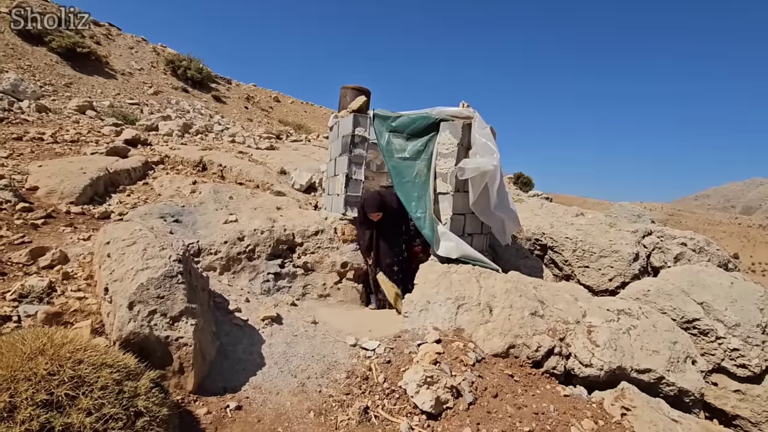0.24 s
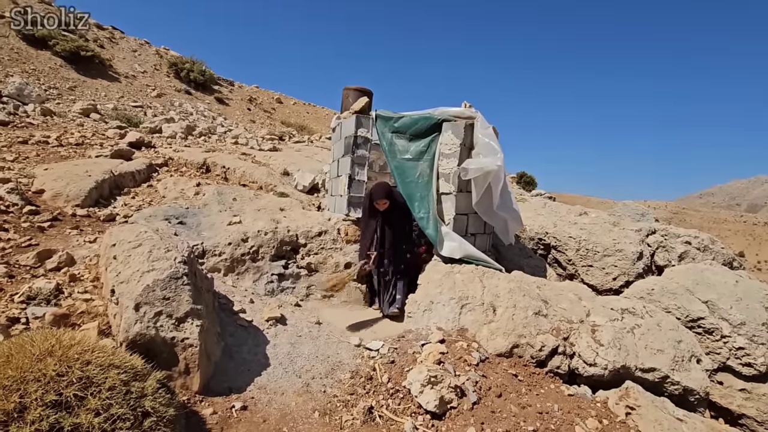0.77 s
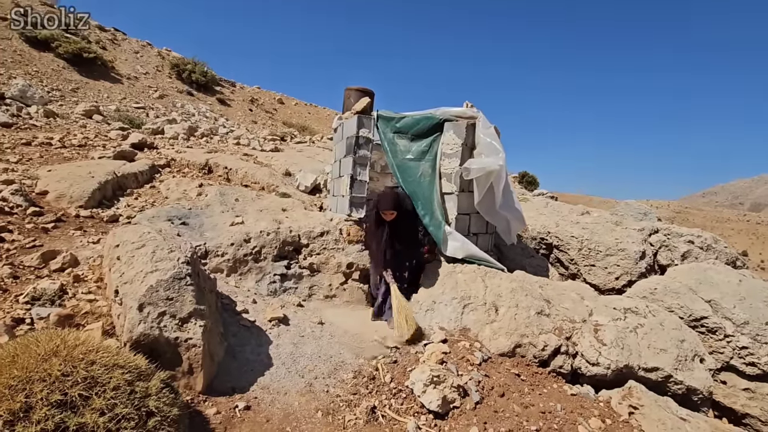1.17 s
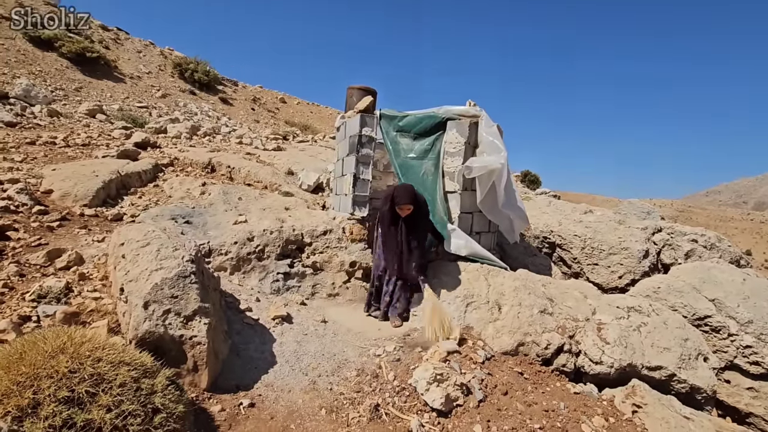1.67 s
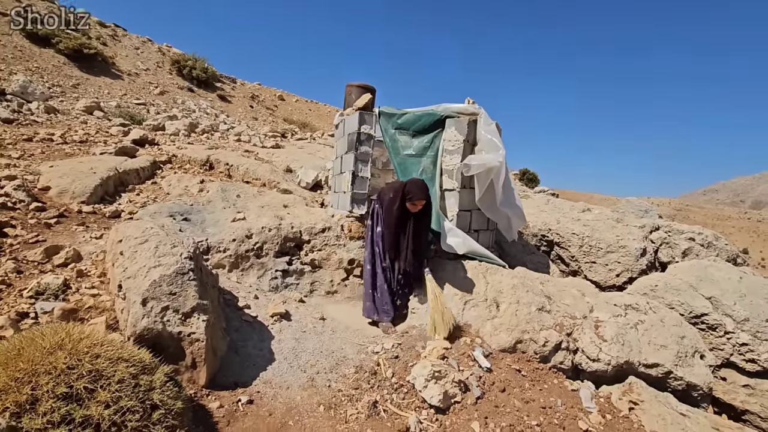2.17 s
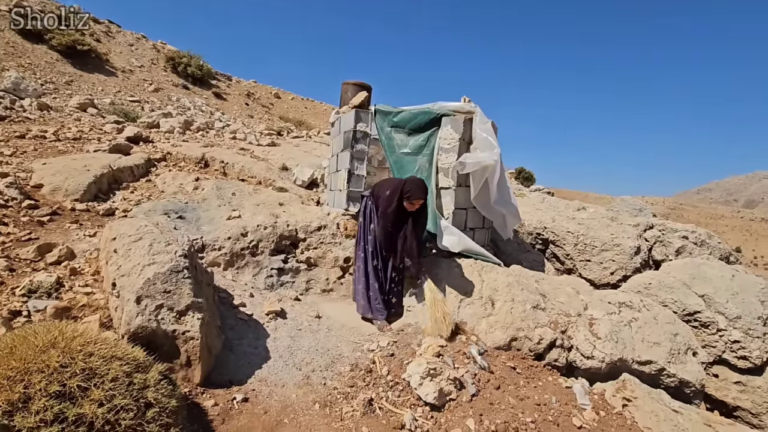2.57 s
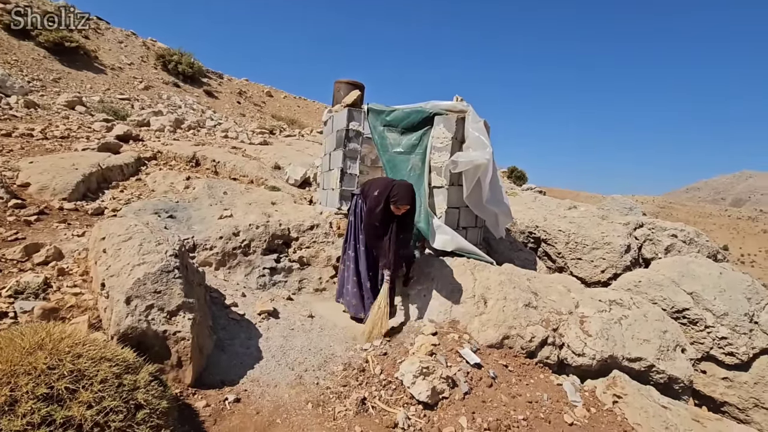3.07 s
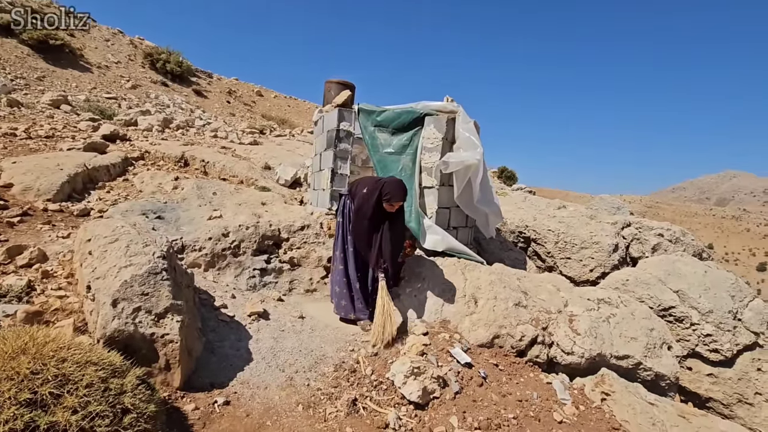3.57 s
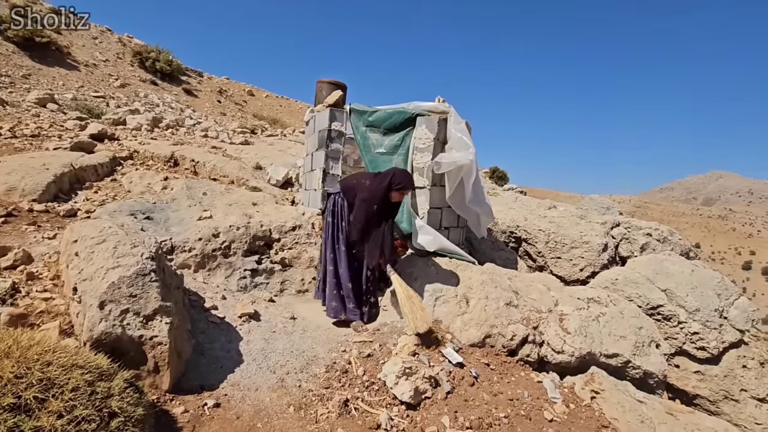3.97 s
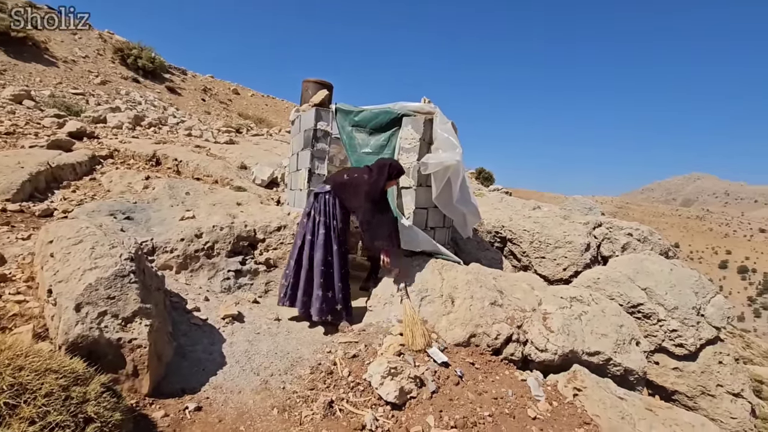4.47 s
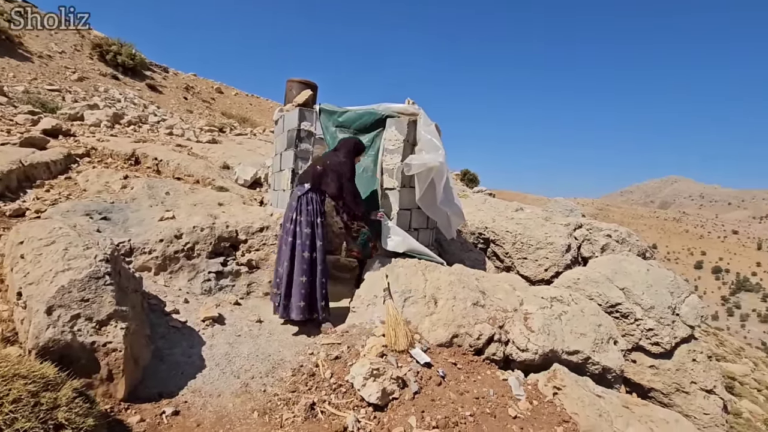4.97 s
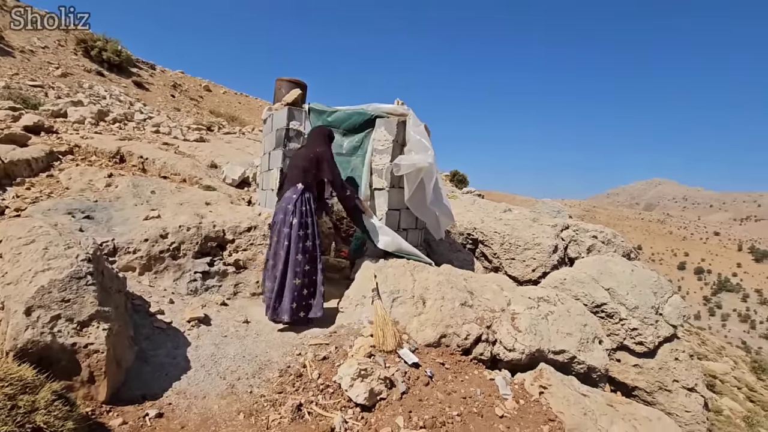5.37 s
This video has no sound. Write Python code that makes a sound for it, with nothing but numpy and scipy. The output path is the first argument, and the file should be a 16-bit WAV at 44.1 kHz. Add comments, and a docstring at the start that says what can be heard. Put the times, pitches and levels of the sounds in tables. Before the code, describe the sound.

Dry straw hisses over dirt in short swipes of uneven strength, the fifth strongest, each followed by a fine sprinkle of dust. Gravelly footfalls and bright straw ticks fill the gaps. After the last swipe come a tiny stone ring, a crisp broom drop, soft clothing rustle and dull hollow knocks. Faint high chick peeps and low wind bumps sit behind, in open air with only a thin echo from rocks, heard by a stereo microphone.

```python
"""Short straw broom on dry dirt and rock

Outdoors, straw tips hiss and grit rattles in dense random grains that follow the pressure of each stroke.
Thrown dust trickles after it, feet crunch, clothes rustle, and straws and stones click as filtered bursts.
The broom is dropped; a stone flake rings and something hollow thumps, both as sums of dying modes.
A chick peeps faintly in gliding tones all along, and filtered noise makes wind rumble on the microphone."""
import sys
import numpy as np
from scipy import signal
from scipy.fft import rfft, irfft, next_fast_len
from scipy.io import wavfile
from scipy.ndimage import uniform_filter1d

SR = 44100
rng = np.random.default_rng(int(sys.argv[2]) if len(sys.argv) > 2 else 0)


def bounce(signal):
    """Save signal as a 16-bit WAV file at the path given by the first command-line argument."""
    frames = np.transpose(np.atleast_2d(signal))
    limited = np.clip(frames, -1, 1)
    pcm = np.round(limited * 32767).astype(np.int16)
    wavfile.write(sys.argv[1], SR, pcm)


N = 247577
TIME = np.arange(N) / SR
PADDED = next_fast_len(N)
HZ = np.fft.rfftfreq(PADDED, 1 / SR)

# Broom strokes. Each row: start in seconds, length in seconds, relative hiss level at mid-stroke in dB,
# leaning in dB/s, attack in seconds, lifting off in dB/s, grit against the hiss in dB,
# thrown dust against the hiss in dB.
STROKES = [(0.27, .14, -36.8, 37, .021, 495, -17, -32), (0.936, .209, -49.5, 120, .006, 230, -12, -10.5),
           (1.524, .273, -34.3, -61, .038, 400, -24, -13.5), (2.02, .238, -42.5, 44, .027, 300, -15, -24),
           (2.478, .161, -30.8, -36, .073, 290, -12.5, -24.5),
           (3.012, .2, -37.9, -14, .023, 295, -14, -17.5), (3.5, .123, -45.4, -95, .013, 375, -11, -17)]
# Colour of straw and dust. Each row: frequency in Hz, relative density in dB per Hz.
STRAW_COLOUR = [(300, -32), (900, -30.5), (2000, -12), (3900, -10), (5400, -1), (7000, -2), (8300, -5.5),
                (9800, -7), (11300, 1), (13300, -2), (14500, 1.5), (16000, -3)]


def gain_of(db):
    """Turns decibels into an amplitude factor."""
    return 10 ** (np.asarray(db) / 20)


def evened(x):
    """Scales to rms 1."""
    return x / np.sqrt(np.mean(x ** 2) + 1e-20)


def read(points, hz):
    """Reads a table on a log-frequency axis."""
    f, value = np.transpose(points)
    return np.interp(np.log(hz + 1), np.log(f + 1), value)


def add(mix, s, sound):
    """Lays a sound into the mix from a given second, cut at the end."""
    part = mix[..., max(round(s * SR), 0):][..., :sound.shape[-1]]
    part += sound[..., :part.shape[-1]]


def hump(s, width_s):
    """A bell-shaped swell of height 1 around a moment; the width is its standard deviation."""
    return np.exp(-.5 * ((TIME - s) / width_s) ** 2)


def dying(s, db_per_s):
    """Starts at full strength and fades evenly in dB."""
    return (TIME >= s) * gain_of(-db_per_s * np.maximum(TIME - s, 0))


def wander(rate_hz):
    """Slow random drift of rms 1: noise without its content above the rate."""
    lowpass = 1 / (1 + (HZ / rate_hz) ** 4)
    return evened(irfft(rfft(rng.standard_normal(PADDED)) * lowpass, PADDED)[:N])


def coloured(x, spectrum):
    """Causal minimum-phase filter with the given spectrum, so clicks keep their sharp front; rms 1."""
    log_gain = np.log(gain_of(read(spectrum, abs(np.fft.fftfreq(8192, 1 / SR)))))
    response = np.exp(signal.hilbert(log_gain).conj())
    taps = np.fft.ifft(response).real[:4096]
    return evened(signal.oaconvolve(x, taps[None], axes=1)[:, :N])


def band(x, hz, octaves):
    """One broad resonance."""
    half = 2 ** (octaves / 2)
    edges = np.clip([hz / half, hz * half], 20, SR / 2 - 500)
    return signal.sosfilt(signal.butter(2, edges, "band", fs=SR, output="sos"), x)


def grains(per_s, spread_db, ring_s, top_hz, size):
    """Many small contacts of uneven strength, each ringing briefly at its own pitch; rms 1."""
    chance, strength, pitch, damping, phase = rng.random((5, N))
    at = np.flatnonzero(chance < per_s / SR)
    life = ring_s * (.15 + damping[at])
    loudness = gain_of(-spread_db * np.log(strength[at] + .015)) / np.sqrt(life)
    swing = loudness * np.exp(2j * np.pi * phase[at])
    # one sample's turn and decay of each contact
    step = np.exp((2j * np.pi * top_hz * pitch[at] - 1 / life) / SR)
    side = rng.choice([-1, 1], N)[at]
    out = np.zeros((2, N + size))
    for age in range(size):
        out[0][at + age] += swing.real
        out[1][at + age] += swing.imag * side
        swing = swing * step
    return evened(out[:, :N])


def clicks(rows, octaves, scatter):
    """A sharp crack and a brief noisy scatter after it, in one broad resonance."""
    out, t = np.zeros((2, N)), TIME[:4096]
    for s, db, hz, t60 in rows:
        burst = scatter * rng.standard_normal((2, len(t))) * gain_of(-60 * t / t60)
        burst[0, 0] += 1
        click = band(burst, hz, octaves)
        # every click gets the energy of 1.8 ms at full level
        even = np.sqrt(SR * 0.0018 / np.sum(click ** 2))
        add(out, s, gain_of(db) * click * even)
    return out


def ring(modes):
    """Dying modes of a struck thing, as a sum of fading cosines."""
    t = TIME[:SR]
    return sum(gain_of(db - 60 * t / t60) * np.cos(2 * np.pi * hz * t) for hz, db, t60 in modes)


def rocks(x, t60):
    """The rocks nearby scatter a short, thin echo through sparse random taps."""
    t = TIME[:SR // 3]
    sparse = (rng.random((2, len(t))) < 2000 / SR) * (t > .004)
    taps = rng.standard_normal((2, len(t))) * sparse * gain_of(-60 * t / t60)
    return signal.oaconvolve(x, taps / np.linalg.norm(taps[0]), axes=1)[:, :N]


def outdoors():
    """Lumpy low noise of wind on the microphone over the quiet outdoor air."""
    # Puffs of wind. Each row: centre in seconds, relative level in dB, spread in seconds.
    puffs = [(.11, -60, .025), (.72, -63, .12), (1.27, -53, 0.062), (1.49, -57.5, 0.063), (2.09, -59, .03),
             (2.39, -54.5, .04), (2.62, -62, .08), (2.855, -50, .025), (2.97, -52, .07), (4.65, -54, 0.052),
             (4.91, -51, .04), (5.28, -49.5, 0.051), (5.53, -56.5, .04)]
    # Colours of wind and air. Each row: frequency in Hz, relative density in dB per Hz.
    wind_colour = [(10, -5.5), (35, 0.5), (60, -0.5), (110, -13.5), (200, -20), (400, -42.5), (1500, -83.5)]
    air_colour = [(20, 2), (120, -6), (210, 1.5), (330, -15.5), (550, -9.5), (850, -18.5), (1400, -17),
                  (2300, -14.5), (4000, -21), (6500, -24.5), (9500, -43), (12000, -26), (16000, -27.5)]
    breeze_db = -66.5  # the steady part under the puffs
    power = gain_of(breeze_db) ** 2 + sum((gain_of(db) * hump(s, width)) ** 2 for s, db, width in puffs)
    gusts = coloured(rng.standard_normal((2, N)), wind_colour) * gain_of(2.57 * wander(12.6))
    air = coloured(rng.standard_normal((2, N)), air_colour) * gain_of(1.5 * wander(5.9))
    return np.sqrt(power) * gusts + gain_of(-70.5) * air


def chick():
    """Each peep is two brief upward flicks and a longer slur that hooks over at the top, slightly rough."""
    # Peeps. Each row: time in seconds, relative level in dB.
    peeps = [(0.093, -60), (0.205, -61), (0.433, -64), (0.561, -67), (0.737, -69), (1.943, -59),
             (2.308, -57), (2.438, -57), (2.695, -61), (2.818, -64), (2.955, -63), (3.751, -67),
             (3.988, -70), (4.253, -66), (4.681, -66), (4.885, -65), (5.008, -62), (5.133, -62),
             (5.302, -64), (5.457, -65), (5.59, -64)]
    # Slurs of one peep. Each row: offset in seconds, length in seconds, starting pitch and
    # pitch aimed at as shares of the reference pitch, level in dB.
    slurs = [(-.012, 0.013, 0.6, 1.1, -6), (-.006, 0.011, 0.56, 1.12, -5), (0, .033, .58, 1., -0.5)]
    # Drift of the reference pitch. Each row: time in seconds, pitch in Hz.
    pitch_drift = [(0, 3114), (3, 3025), (4.7, 2680), (5.1, 2950)]
    out = np.zeros((2, N))
    for s, db in peeps:
        reference_hz = np.interp(s, *np.transpose(pitch_drift))
        for offset, length, first, aim, slur_db in slurs:
            u = np.linspace(0, 1, int(length * SR))
            hook = np.interp(u, [0, .72, 1], [0, 1.05, .75])
            rough = 1 + .17 * uniform_filter1d(rng.standard_normal(len(u)), size=30)
            hz = reference_hz * (first + (aim - first) * hook) * rough
            swell = np.sin(np.pi * u ** 1.1).clip(0) ** 0.71
            tone = np.sin(2 * np.pi * np.cumsum(hz) / SR)
            add(out[0], s + offset, gain_of(db + slur_db) * swell * tone)
    return gain_of(4.) * out + gain_of(-9) * rocks(out[[0, 0]], t60=0.12)


def rustles():
    """Soles sliding and the skirt rustling: soft swells of fine rubbing grains."""
    # Rustles. Each row: start in seconds, relative level in dB, length in seconds, centre in Hz,
    # width in octaves.
    rubs = [(0.75, -64, .19, 2200, .6), (0.76, -73, .18, 6000, 1.3), (2.464, -60, 0.073, 1520, 1.3),
            (2.56, -60.5, 0.058, 510, .8), (2.78, -57, .025, 2200, .7), (3.466, -52, .025, 1600, .9),
            (3.87, -71, .22, 1520, 1.3), (4.19, -62, .17, 9500, 1.5), (4.225, -63.5, .06, 2270, 1.3),
            (4.379, -52, .05, 2600, 1.3), (4.378, -54, 0.057, 11000, 1.3), (4.55, -64.5, .06, 7500, 1.3),
            (4.965, -72, .04, 1200, .5), (5.183, -60, .07, 5050, 1.3), (5.18, -62, .1, 700, 1.3),
            (5.352, -69, 0.12, 5000, 1.3), (5.3, -75, 0.19, 1130, .9)]
    fine = grains(per_s=4000, spread_db=2.5, ring_s=0.00072, top_hz=16970, size=100)
    out = np.zeros((2, N))
    for s, db, length, hz, octaves in rubs:
        swell = signal.windows.tukey(int(length * SR), .7)
        piece = fine[:, int(s * SR):][:, :len(swell)]
        add(out, s, gain_of(db) * swell * evened(band(piece, hz, octaves)))
    return out


def steps():
    """Soles crunch and scuff: each footfall crushes a short burst of gravel grains."""
    # Footfalls. Each row: start in seconds, relative level in dB.
    footfalls = [(1.219, -45), (1.297, -47), (1.362, -34), (1.382, -48), (1.434, -40), (1.932, -41),
                 (1.997, -38), (2.781, -51), (3.359, -50), (3.465, -43), (5.177, -44.5), (5.189, -45)]
    # Colour of grit. Each row: frequency in Hz, relative density in dB per Hz.
    gravel_colour = [(100, -23.5), (280, -13.5), (400, -20), (520, -4.5), (660, -3.5), (830, -13.5),
                     (1100, -4.5), (1500, -1.5), (2300, 0), (3000, -3.5), (4000, -9.5), (6000, -8),
                     (9000, -20.5), (16000, -27.5)]
    attack_s, t60_s = .004, .14
    press = np.zeros(N)
    for s, db in footfalls:
        rise = np.clip((TIME - s) / attack_s, 0, 1)
        press += gain_of(db) * dying(s, 60 / t60_s) * rise
    gravel = grains(per_s=3000, spread_db=2.5, ring_s=0.0014, top_hz=10040, size=240)
    return gain_of(-4.5) * press * coloured(gravel, gravel_colour)


def thumps():
    """Something hollow booms in its modes, duller the longer the push."""
    # Pushes. Each row: start in seconds, relative level in dB, length in seconds.
    bumps = [(3.005, -56, .004), (4.348, -42, .008), (4.424, -50, 0.0031), (5.005, -55, 0.0037),
             (5.179, -39.5, .004), (5.19, -38.5, .002), (5.2, -31.5, 0.0039), (5.305, -37, .0028)]
    # Modes of the hollow thing. Each row: frequency in Hz, level in dB, t60 in seconds.
    hollow_modes = [(110, -8, .08), (160.2, 0, .1), (197.6, 0, 0.1), (183.6, -15, 0.55), (292, -16, 0.027),
                    (510, -9.5, 0.078), (1020, -7.5, 0.062)]
    out = np.zeros((2, N))
    boom = ring(hollow_modes)
    for s, db, push_s in bumps:
        push = np.hanning(max(int(push_s * SR), 3))
        add(out[0], s, gain_of(db) * signal.fftconvolve(boom, push / push.sum()))
    return out


def flake():
    """A flake of stone chinks off to the right, ringing in its modes."""
    # Modes of the flake. Each row: frequency in Hz, level in dB, t60 in seconds.
    flake_modes = [(4960, -10, .03), (5380, -12, 0.033), (7320, 4.5, .04), (7520, -12.5, .025),
                   (10300, -3.5, 0.036), (11050, -18.5, 0.017), (11470, 7.5, 0.021), (15200, -25.5, .02)]
    out = np.zeros((2, N))
    rise = np.minimum(TIME[:SR] / 0.00065, 1)
    lean = np.array([[1], [-.25]])  # a negative unshared part leans right
    add(out, 3.629, gain_of(-26.5) * ring(flake_modes) * rise * lean)
    return out


def pebbles():
    """Pebbles knock on rock: low, broad clicks."""
    # Knocks. Each row: start in seconds, relative level in dB, centre in Hz.
    knocks = [(1.363, -35, 2220), (1.692, -26.5, 670), (2.008, -29, 2500), (2.768, -43, 2040),
              (3.241, -31, 1500), (3.263, -38.5, 750)]
    t60_s = 0.022
    return gain_of(-2.0) * clicks([(*row, t60_s) for row in knocks], octaves=1.97, scatter=0.2)


def snaps():
    """Single straws snap free of the ground: bright clicks."""
    # Snaps. Each row: start in seconds, relative level in dB, centre in Hz.
    straws = [(1.2586, -39, 6220), (1.2755, -41, 5410), (1.286, -38.5, 6110), (1.4077, -32, 4690),
              (1.5313, -41, 6550), (2.1914, -32, 11300), (2.2199, -31, 7310), (2.5288, -28, 5800),
              (3.319, -38.5, 5500), (3.3334, -42, 6000), (3.3603, -42, 5300), (3.4077, -46, 8100),
              (3.4261, -40.5, 13000), (3.4675, -38.5, 4650), (3.486, -31.5, 6380), (3.5149, -37, 13900),
              (3.841, -45, 7000), (3.8677, -37, 9500), (4.1547, -47, 4830), (4.1744, -40, 11000)]
    t60_s = 0.025
    return gain_of(-2.0) * clicks([(*row, t60_s) for row in straws], octaves=1.27, scatter=0.28)


def landing():
    """The dropped broom lands: clicks in narrower resonances."""
    # Impacts. Each row: start in seconds, relative level in dB, centre in Hz, scatter t60 in seconds.
    impacts = [(4.426, -24.5, 6300, 0.0066), (4.4262, -38.5, 1730, 0.017), (4.4262, -47.5, 524, .02),
               (4.427, -31, 6300, 0.079)]
    return gain_of(2.5) * clicks(impacts, octaves=0.51, scatter=0.1)


def contact(start, length, db, lean_db_per_s, attack_s, lift_db_per_s):
    """One stroke: the straws bend onto the ground, the arm leans in or eases off, the broom lifts."""
    age = np.maximum(TIME - start, 0)
    touch = -42 * np.exp(-age / attack_s)  # dB below full contact
    lean = lean_db_per_s * (np.minimum(age, length) - length / 2)
    lift = lift_db_per_s * np.maximum(age - length, 0)
    return (TIME >= start) * gain_of(db + touch + lean - lift)


def trickle():
    """Dust and a few coarser crumbs thrown up by each stroke settle after it."""
    fade_db_per_s, rise_s = 44, .03
    loose = gain_of(-80) * dying(0, 1.5)  # still settling from earlier sweeping
    for *stroke, _, dust_db in STROKES:
        lift_s = stroke[0] + stroke[1]
        thrown = np.interp(lift_s, TIME, contact(*stroke)) * gain_of(dust_db)
        rise = np.clip((TIME - lift_s) / rise_s, 0, 1)
        loose = loose + thrown * dying(lift_s, fade_db_per_s) * rise
    dust = grains(per_s=7000, spread_db=3.0, ring_s=0.00078, top_hz=17120, size=80)
    crumbs = grains(per_s=170, spread_db=3, ring_s=0.0033, top_hz=12020, size=300)
    fine = gain_of(0.5) * coloured(dust, STRAW_COLOUR)
    coarse = gain_of(-6.5) * evened(band(crumbs, 4500, octaves=2.8))
    return loose * (fine + coarse)


def broom():
    """Straw tips flick over the rock in a dense hiss; coarser grit tumbles where the broom presses."""
    # Little heaps of grit that the broom shoves. Each row: centre in seconds, relative rattle level
    # in dB, spread in seconds.
    heaps = [(1.151, -30.5, .014), (1.678, -34, .022), (1.757, -48, .04), (2.164, -48.5, .055),
             (3.081, -48, .007), (3.62, -60, .035)]
    # Colour of grit. Each row: frequency in Hz, relative density in dB per Hz.
    grit_colour = [(100, -23.5), (280, -13.5), (400, -20), (520, -4.5), (660, -3.5), (830, -13.5),
                   (1100, -4.5), (1500, -1.5), (2300, 0), (3000, -3.5), (4000, -9.5), (6000, -8),
                   (9000, -20.5), (16000, -27.5)]
    # the straws of the dropped broom splay and settle
    hiss = gain_of(-34.5) * dying(4.427, db_per_s=301)
    rattle = gain_of(-16.5) * hiss + sum(gain_of(db) * hump(s, width) for s, db, width in heaps)
    for *stroke, grit_db, _ in STROKES:
        press = contact(*stroke)
        hiss = hiss + press
        rattle = rattle + gain_of(grit_db) * press
    tips = grains(per_s=20000, spread_db=1.56, ring_s=.0009, top_hz=17060, size=80)
    tips = tips * gain_of(0.91 * wander(35))
    grit = grains(per_s=2200, spread_db=2.5, ring_s=0.0041, top_hz=8010, size=400)
    grit = grit * gain_of(1.4 * wander(70))
    straw_sound = gain_of(3.) * hiss * coloured(tips, STRAW_COLOUR)
    return straw_sound + gain_of(-1.8) * rattle * coloured(grit, grit_colour)


def ports(x):
    """A shared and an unshared part become the microphone pair: alike in the bass, apart in the treble."""
    # Left-right likeness. Each row: frequency in Hz, correlation (no unit).
    likeness = [(50, 0.9), (180, 0.77), (500, 0.55), (1200, 0.71), (2500, 0.35), (5000, 0.2),
                (10000, 0.1941), (16000, 0)]
    # Left-right balance. Each row: frequency in Hz, left minus right in dB.
    balance = [(50, 3.5), (400, 3), (1200, -3), (2500, -3), (5500, -3), (9000, -1.7), (16000, -1.4)]
    shared, unshared = rfft(x, PADDED)
    same = np.clip(read(likeness, HZ), -1, 1)
    mid = shared * np.sqrt((1 + same) / 2)
    side = unshared * np.sqrt((1 - same) / 2)
    lean = gain_of(read(balance, HZ) / 2)
    lag = np.exp(-2j * np.pi * HZ * 5e-5)  # seconds: the left port is a little farther away
    return irfft(np.array([(mid + side) * lean * lag, (mid - side) / lean]), PADDED)[:, :N]


def scene():
    """Near sounds with their echo off the rocks, over the wind and air."""
    near = chick() + rustles() + steps() + thumps() + flake()
    near = near + pebbles() + snaps() + landing() + trickle() + broom()
    return ports(near + gain_of(-16.5) * rocks(near, t60=.14) + outdoors())


def record(dry):
    """The recorder's band limit: a steep low-pass at 16.1 kHz."""
    lowpass = signal.firwin(511, 16100, window=("kaiser", 9), fs=SR)
    return signal.oaconvolve(dry, lowpass[None], "same")


dry = scene()
out = record(dry)
bounce(out)
```